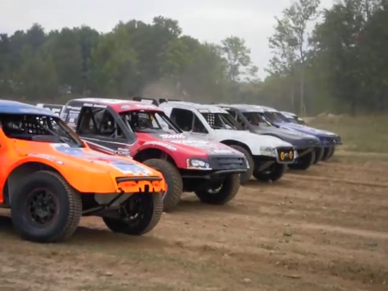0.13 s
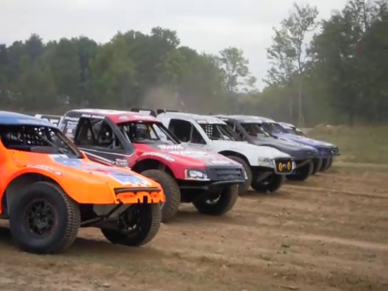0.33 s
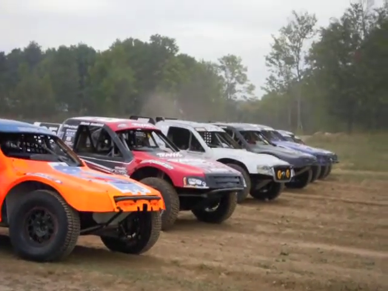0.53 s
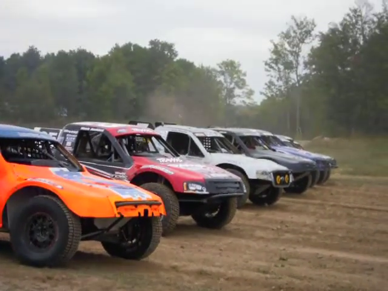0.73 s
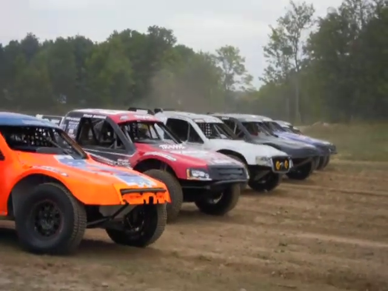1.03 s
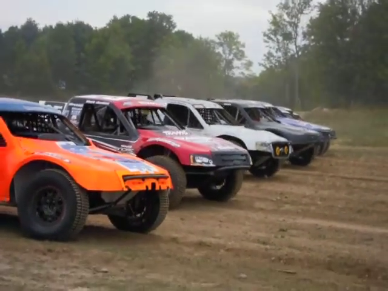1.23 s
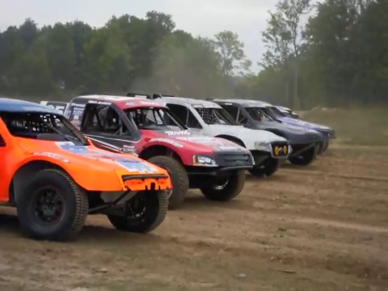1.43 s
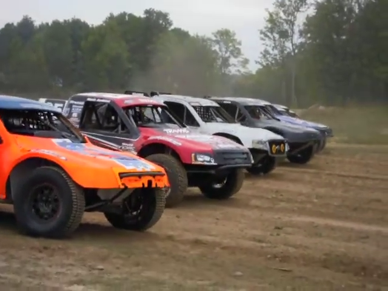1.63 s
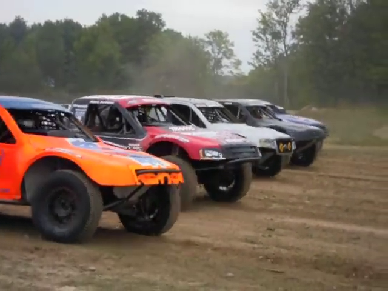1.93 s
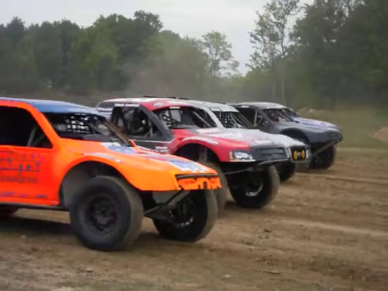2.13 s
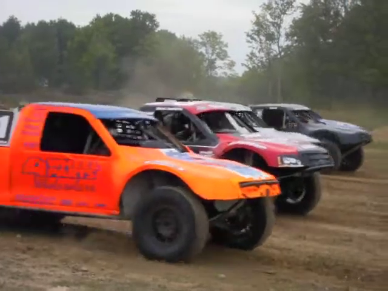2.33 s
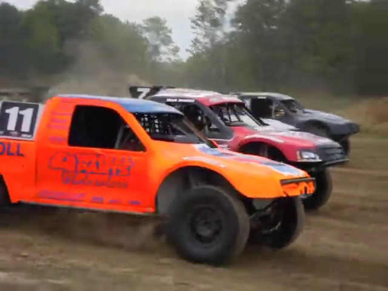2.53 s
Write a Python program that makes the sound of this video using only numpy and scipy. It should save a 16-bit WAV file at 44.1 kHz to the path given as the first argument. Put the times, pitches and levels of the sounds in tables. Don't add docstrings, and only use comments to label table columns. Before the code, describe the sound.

Powerful eight-cylinder race truck engines hold steady revs close by while others waver and blip behind; then throttles snap open and all roar upward, outdoors on dirt, through a small overloaded camera microphone.

```python
import sys
import numpy as np
from scipy import signal
from scipy.fft import rfft, irfft, next_fast_len
from scipy.io import wavfile
from scipy.ndimage import map_coordinates

SR = 44100
rng = np.random.default_rng(int(sys.argv[2]) if len(sys.argv) > 2 else 0)


def makeup_ratio(level_db):
    decades = np.asarray(level_db, float) / 20
    return 10 ** decades


def output_pcm(signal):
    pcm = np.clip(np.atleast_2d(signal).T, -1, 1) * 32767
    wavfile.write(sys.argv[1], SR, np.round(pcm).astype(np.int16))


N = 117747

# [t/s, firing rate f/Hz, firing line level/dB]
LEAD_TRACK = [(0, 205.5, -9.5), (.35, 205.6, -12), (.7, 204.3, -12.5), (1, 202.5, -9), (1.2, 201.3, -9.5),
              (1.4, 198, -9), (1.6, 200, -10), (1.64, 199.6, -17), (1.68, 207.8, -8.5), (1.75, 212.6, -17),
              (1.85, 222.4, -14), (1.96, 241.8, -12), (2.08, 247.6, -6.5), (2.2, 256.8, -13.5),
              (2.38, 281.1, -13.5), (2.55, 308.7, -11), (2.67, 324.8, -12)]
# [shaft order, level/dB over the drive]
HELD_ORDERS = [(1, -19), (2, -21.5), (3, -23.5), (5, -22), (6, -23), (7, -13), (8, -14), (9, -16.5),
               (10, -28), (11, -16.5), (12, -26), (13, -26), (14, -34), (15, -26.5), (16, -19.5), (17, -27),
               (18, -33.5), (19, -23.5), (20, -25), (21, -30.5), (22, -35), (23, -31), (26.5, -30.5),
               (28, -31), (31, -32.5), (32, -30), (33.5, -35.5)]
# [shaft order, level/dB over the drive]
PULLING_ORDERS = [(1, -6), (2, -19), (3, -3), (5, -6), (6, -15), (7, -13), (8, -6), (9, -18.5), (10, -20.5),
                  (11, -18), (12, -19), (13, -23), (14, -25.5), (15, -23.5), (16, -24)]
# [f/Hz, level/dB]
PIPE_RESONANCES = [(300, -0.5), (350, -6.5), (420, 0.5), (510, -5), (600, 1.5), (700, -6.5), (870, 1),
                   (1100, -4)]
# [f/Hz, level/dB per Hz]
BARK_SPECTRUM = [(220, -7), (300, -8), (450, 1), (700, -12.5), (900, -5.5), (1250, -11), (1600, -11),
                 (2000, -19.5)]
# [f/Hz, level/dB per Hz]
SPRAY_SPECTRUM = [(1500, -15), (2000, -4.5), (2450, 1.5), (2750, 0), (3050, -2.5), (3350, 0), (3600, -2.5),
                  (4800, 0)]
# [t/s, firing rate f/Hz, level/dB]
SECOND_TRACK = [
    (0, 186.9, -13),
    (.15, 188.5, -13.5),
    (.32, 194.3, -19.5),
    (.6, 188, -17.5),
    (.8, 187, -28),
    (1.1, 189, -22.5),
    (1.4, 192, -25.5),
    (1.68, 185.9, -13),
    (1.8, 188, -24.5),
    (2.67, 262.8, -30.5),
]
# [t/s, firing rate f/Hz, level/dB]
THIRD_TRACK = [
    (0, 253, -32),
    (0.549, 253.6, -30),
    (0.799, 222, -22.5),
    (1.201, 237.5, -26.5),
    (1.599, 245.1, -30),
    (1.85, 258, -20.5),
    (2.04, 281, -16),
    (2.219, 331, -18.5),
    (2.379, 367.5, -21),
    (2.67, 413.2, -23),
]
# [t/s, firing rate f/Hz, level/dB]
FOURTH_TRACK = [(0, 240, -35.5), (.5, 258.6, -34), (.78, 282, -23), (.95, 285, -36.5), (1.15, 293, -22.5),
                (1.35, 300, -24), (1.65, 294.3, -31.5), (1.87, 399.3, -20), (2.049, 432, -18),
                (2.25, 457.3, -20.5), (2.67, 499.3, -27.5)]
# [t/s, firing rate f/Hz, level/dB]
FIFTH_TRACK = [
    (0, 136.7, -31),
    (.5, 140, -34),
    (1.1, 158, -26),
    (1.449, 176, -23),
    (1.7, 140, -29),
    (2.202, 130, -27),
    (2.67, 165, -30),
]
# [shaft order, level/dB]
NEIGHBOUR_ORDERS = [(1, -11), (2, -18.5), (3, -16), (4, -0.5), (5, -16), (7, -17), (8, -15.5), (11, -21),
                    (12, -23)]
# [f/Hz, t60/s]
TREE_DECAY = [(100, 0.44), (1000, .35), (4000, .2)]
# [f/Hz, level/dB per Hz]
RUMBLE_SPECTRUM = [(20, -24), (38, -17), (58, -1.5), (70, -1), (90, -7), (130, -8.5), (170, -12),
                   (230, -22.5)]
# [f/Hz, level/dB]
MICROPHONE_BAND = [(5, -31), (28, -0.5), (3550, 0.5), (3800, -4), (3990, -22.5), (4200, -16.5),
                   (4400, -28.5), (4650, -52.5), (4750, -72.5), (4950, -85.5)]

LAUNCH_S, LAUNCH_RISE_S, SNAP_S = 1.68, 0.51, .04
LEAD_DB, LEAD_FLUTTER_DB, PULL_FLUTTER_DB = 0.67, 1.5, 1.5
HELD_DB, PULL_DB, HALF_DB = -11, -12.5, -27.5
FIRING_GATE, BANK_GATE, CYCLE_GATE = 0.22, 0.039, .1
EBB_DB_PER_S = -2
BARK_DB, BARK_STEP_DB, BARK_LOAD_DB = -23.5, 3.4, 10
SPRAY_DB, SPRAY_STEP_DB, SPRAY_LOAD_DB = -24.5, 3.5, 10
TREES_DB = -15.5
RUMBLE_DB, RUMBLE_LOAD_DB = -22.5, 4
LURCH_DB, LURCH_S, HUSH_DB = 2, .15, -11
INPUT_DB, CLIP_TOP, CLIP_HARD = -0.53, 0.61, 13


def clock():
    return np.arange(N) / SR


def unit(x):
    return x / np.sqrt(np.mean(x ** 2) + 1e-20)


def along(points, hz, outside=None):
    f, v = np.transpose(points)
    return np.interp(np.log(hz + 1), np.log(f + 1), v, outside, outside)


def curves(rows):
    s, *cols = np.transpose(rows)
    return [np.interp(clock(), s, c) for c in cols]


def wobble(rate):
    coarse = np.arange(0, N + 64, 64)
    knots = rng.standard_normal(int(N * rate / SR) + 4)
    smooth = map_coordinates(knots, [coarse * rate / SR])
    return np.interp(np.arange(N), coarse, smooth)


def filtered(x, response):
    pad = [(0, 0)] * (x.ndim - 1) + [(4096, 4096)]
    m = next_fast_len(N + 8192)
    spectrum = rfft(np.pad(x, pad, "reflect"), m)
    shaped = irfft(spectrum * response(np.fft.rfftfreq(m, 1 / SR)), m)
    return shaped[..., 4096:4096 + N]


def noise(spectrum):
    white = rng.standard_normal(N)
    return unit(filtered(white, lambda hz: makeup_ratio(along(spectrum, hz, -83))))


def load(rise_s=LAUNCH_RISE_S):
    return np.clip((clock() - LAUNCH_S) / rise_s, 0, 1)


def shaft(firing_hz, wander):
    uneven_hz = firing_hz * (1 + wander * wobble(25))
    return 2 * np.pi * np.cumsum(uneven_hz) / SR / 4


def tones(angle, orders, flutter_db, flutter_rate):
    total = 0
    for order, db in orders:
        level = makeup_ratio(db + flutter_db * wobble(flutter_rate))
        total = total + level * np.sqrt(2) * np.sin(order * angle + rng.uniform(0, 2 * np.pi))
    return total


def engine_orders(angle, firing_hz, line_db, ebb_db):
    pull, snap = load(), load(SNAP_S)
    pulling = dict(PULLING_ORDERS)
    orders = []
    for k, held_db in HELD_ORDERS:
        shift_db = pull * (pulling.get(k, -40) - held_db)
        pipe_db = snap * along(PIPE_RESONANCES, k * firing_hz / 4)
        orders.append((k, held_db + shift_db + pipe_db))
    halves = [(k + .5, HALF_DB - 0.33 * k + 5 * pull) for k in range(14)]
    drive_db = HELD_DB + .4 * ebb_db + pull * (PULL_DB - HELD_DB)
    sides = tones(angle, orders + halves, LEAD_FLUTTER_DB + PULL_FLUTTER_DB * snap, 12)
    firing_line = tones(angle, [(4, 0)], 1.2, 14)
    return makeup_ratio(LEAD_DB) * (makeup_ratio(drive_db) * sides + makeup_ratio(line_db) * firing_line)


def exhaust_puffs(angle):
    firing = 1 + FIRING_GATE * np.cos(4 * angle)
    bank = 1 + BANK_GATE * np.cos(angle)
    cycle = 1 + CYCLE_GATE * np.cos(angle / 2)
    return firing * bank * cycle


def exhaust_bark(puffs, ebb_db):
    launch_db = BARK_STEP_DB * load(SNAP_S) + BARK_LOAD_DB * load(1.8)
    level_db = BARK_DB + ebb_db + launch_db + 0.5 * wobble(30)
    return makeup_ratio(level_db) * unit(puffs * noise(BARK_SPECTRUM))


def dirt_spray(puffs):
    ebb_db = EBB_DB_PER_S * np.minimum(clock(), LAUNCH_S)
    launch_db = SPRAY_STEP_DB * load(SNAP_S) + SPRAY_LOAD_DB * load(0.98)
    level_db = SPRAY_DB + ebb_db + launch_db + .7 * wobble(14) + .8 * wobble(70)
    return makeup_ratio(level_db) * unit(puffs * noise(SPRAY_SPECTRUM))


def lead():
    firing_hz, line_db = curves(LEAD_TRACK)
    angle = shaft(firing_hz, 0.0015)
    puffs = exhaust_puffs(angle)
    ebb_db = EBB_DB_PER_S * np.clip(clock() - .5, 0, LAUNCH_S - .5) * (1 - load(SNAP_S))
    body = engine_orders(angle, firing_hz, line_db, ebb_db)
    return body + exhaust_bark(puffs, ebb_db) + dirt_spray(puffs)


def neighbours():
    total = 0
    for rows in (SECOND_TRACK, THIRD_TRACK, FOURTH_TRACK, FIFTH_TRACK):
        firing_hz, level_db = curves(rows)
        total = total + makeup_ratio(level_db) * tones(shaft(firing_hz, .004), NEIGHBOUR_ORDERS, 1.7, 15)
    return total


def trees(x):
    hz, t, z = signal.stft(rng.standard_normal(SR // 2), SR, nperseg=256)
    decay = makeup_ratio(-60 * t / along(TREE_DECAY, hz)[:, None])
    tail = signal.istft(z * decay, SR, nperseg=256)[1]
    return signal.fftconvolve(np.pad(x, (2000, 0), "wrap"), tail / np.linalg.norm(tail))[:N]


def rumble():
    since = clock() - LAUNCH_S
    lurch_db = LURCH_DB * np.exp(-((since - LURCH_S) / LURCH_S) ** 2)
    hush_db = HUSH_DB * np.exp(-((since + .03) / 0.044) ** 2)
    level_db = RUMBLE_DB + RUMBLE_LOAD_DB * load() + lurch_db + hush_db + 1.7 * wobble(6)
    return makeup_ratio(level_db) * noise(RUMBLE_SPECTRUM)


def scene():
    trucks = lead() + neighbours()
    return (trucks + makeup_ratio(TREES_DB) * trees(trucks) + rumble())[None]


def band_limit(x):
    return signal.sosfilt(signal.butter(12, 4820, fs=SR, output="sos"), x)


def record(dry):
    hot = makeup_ratio(INPUT_DB) * dry
    clipped = hot / (1 + np.abs(hot / CLIP_TOP) ** CLIP_HARD) ** (1 / CLIP_HARD)
    narrow = filtered(clipped, lambda hz: makeup_ratio(along(MICROPHONE_BAND, hz)))
    return band_limit(narrow)


dry = scene()
out = record(dry)
output_pcm(out)
```